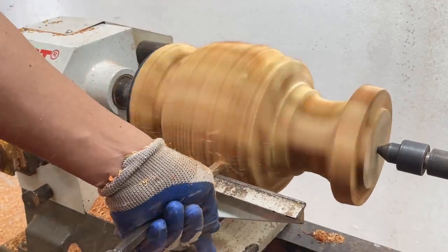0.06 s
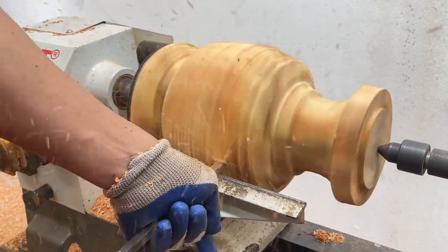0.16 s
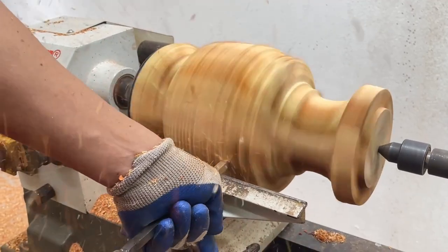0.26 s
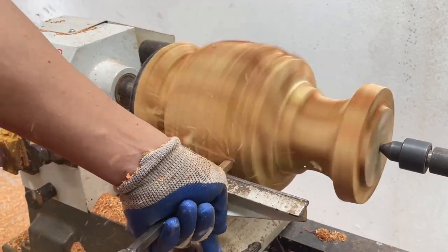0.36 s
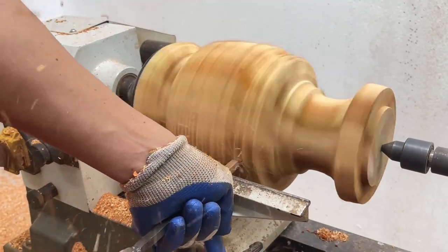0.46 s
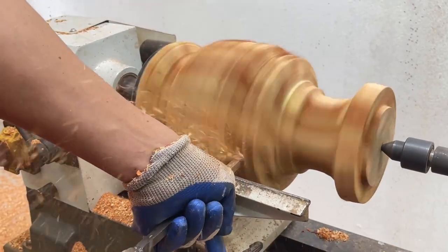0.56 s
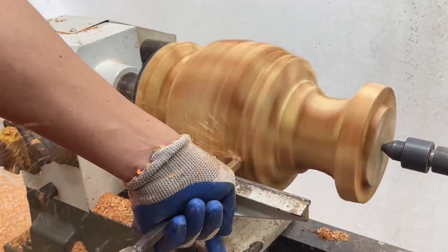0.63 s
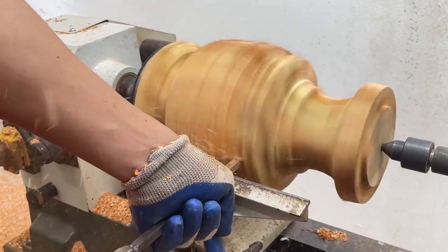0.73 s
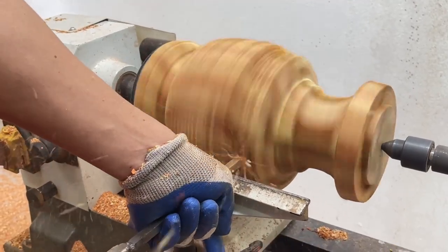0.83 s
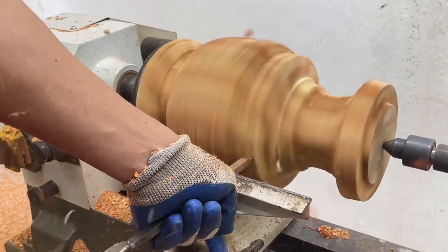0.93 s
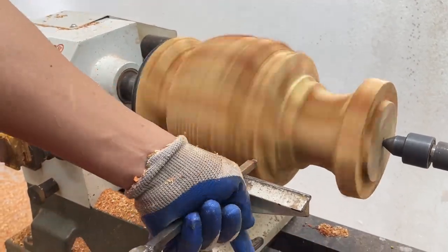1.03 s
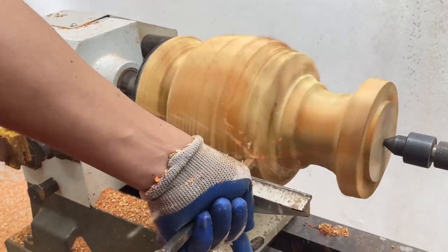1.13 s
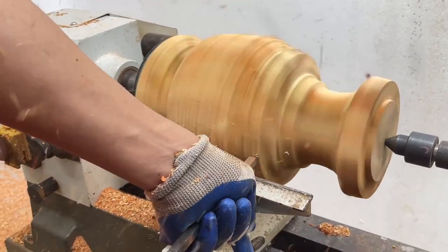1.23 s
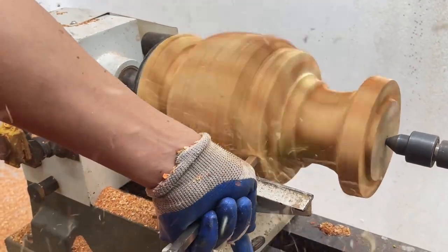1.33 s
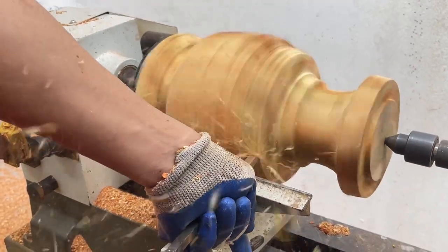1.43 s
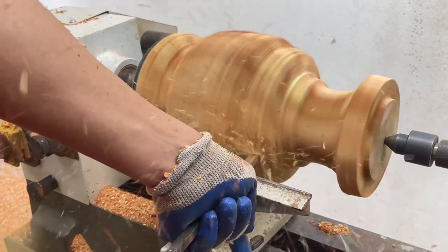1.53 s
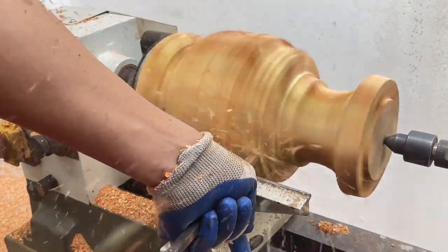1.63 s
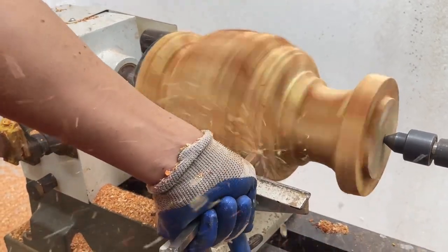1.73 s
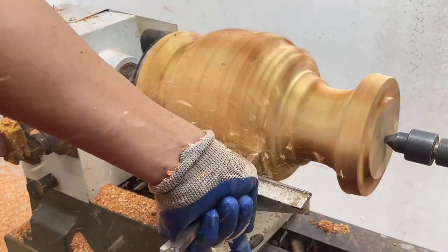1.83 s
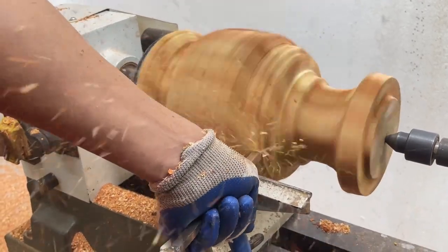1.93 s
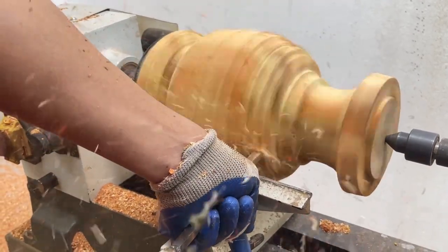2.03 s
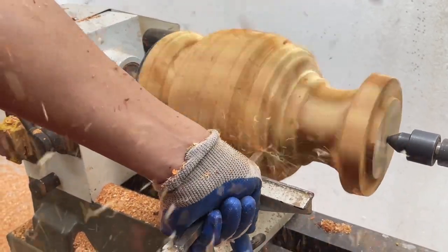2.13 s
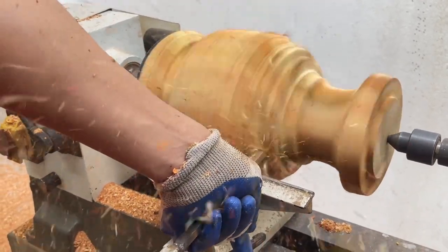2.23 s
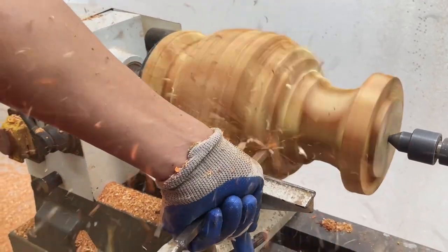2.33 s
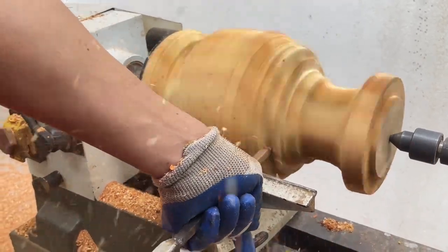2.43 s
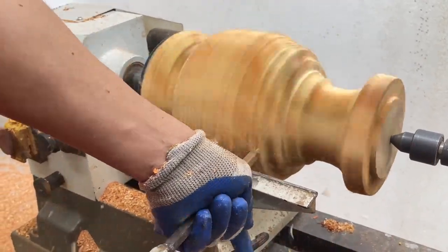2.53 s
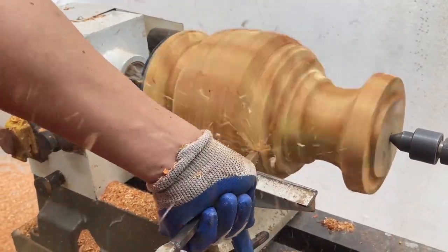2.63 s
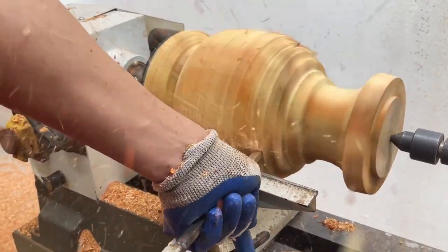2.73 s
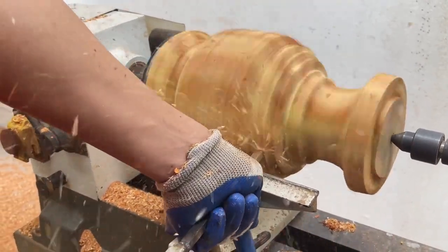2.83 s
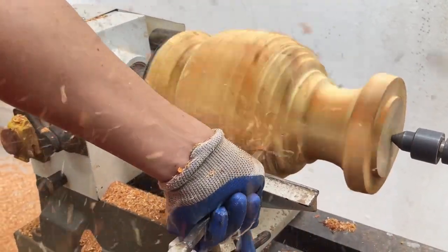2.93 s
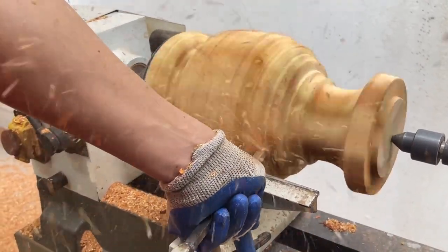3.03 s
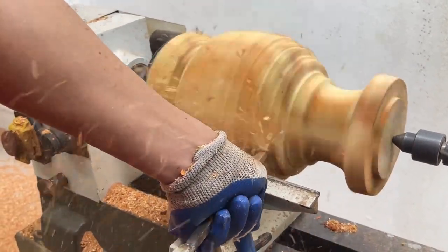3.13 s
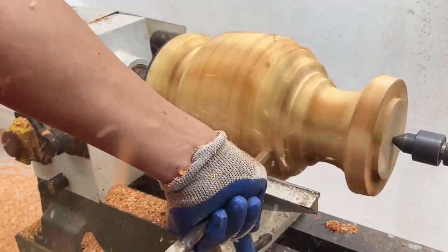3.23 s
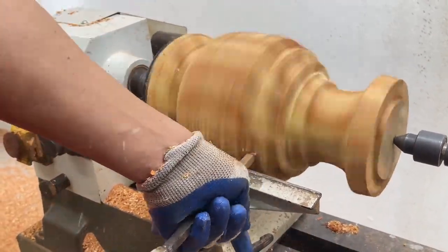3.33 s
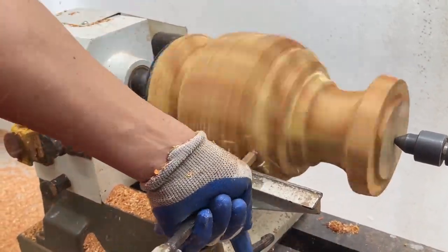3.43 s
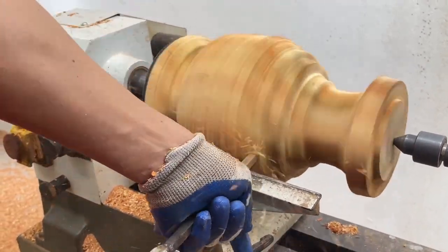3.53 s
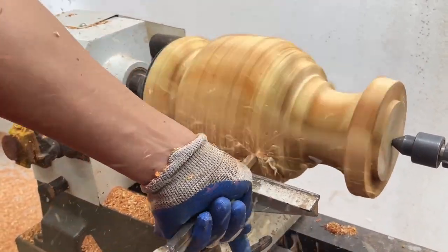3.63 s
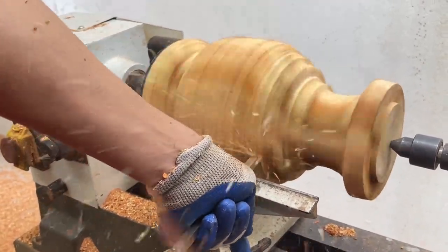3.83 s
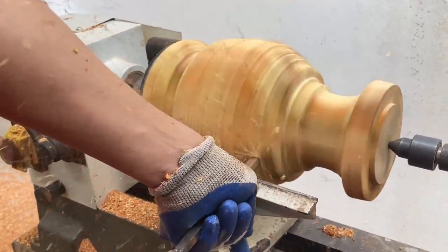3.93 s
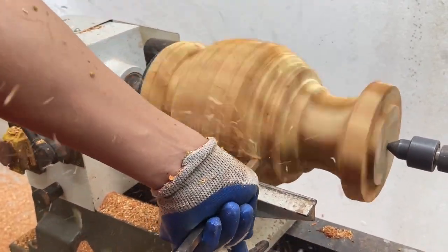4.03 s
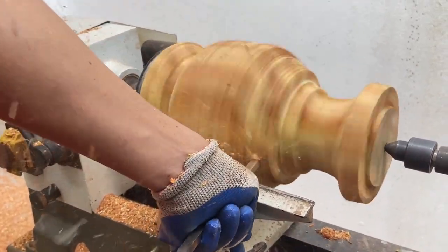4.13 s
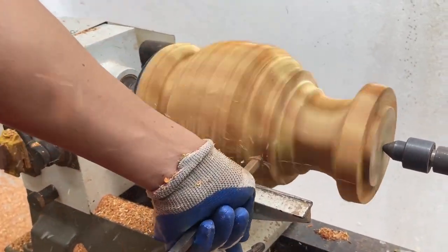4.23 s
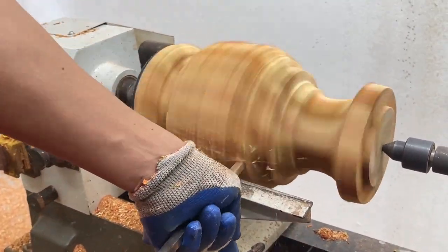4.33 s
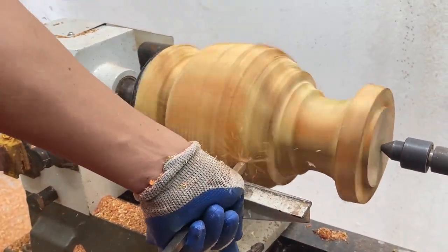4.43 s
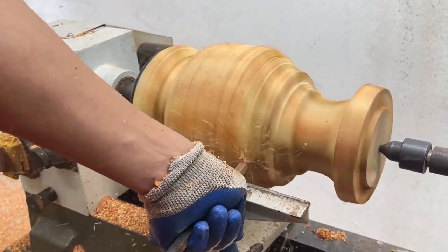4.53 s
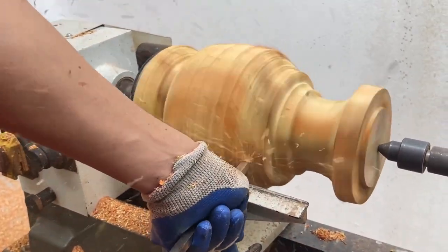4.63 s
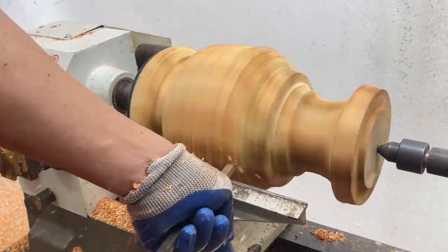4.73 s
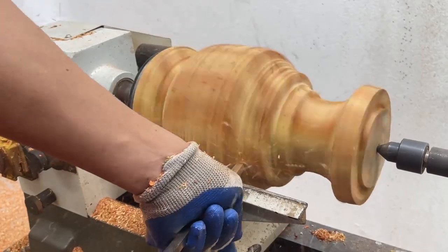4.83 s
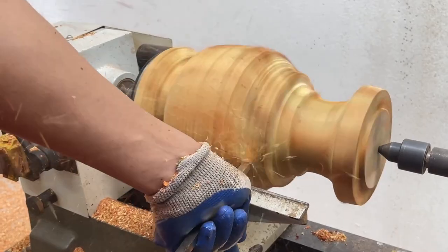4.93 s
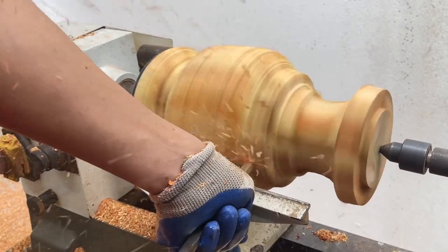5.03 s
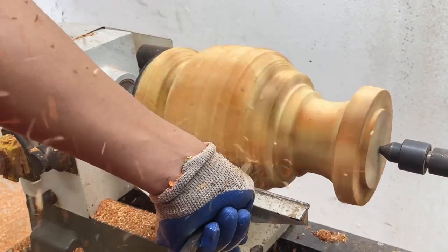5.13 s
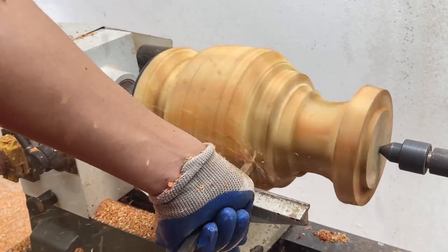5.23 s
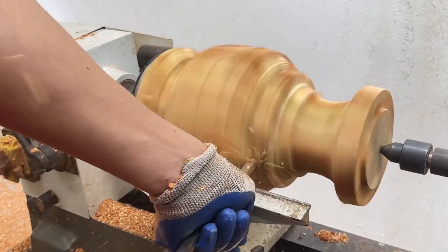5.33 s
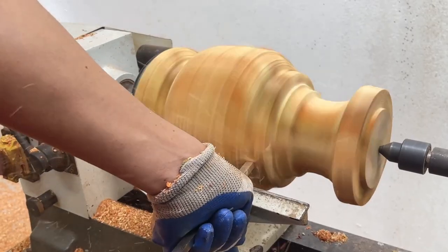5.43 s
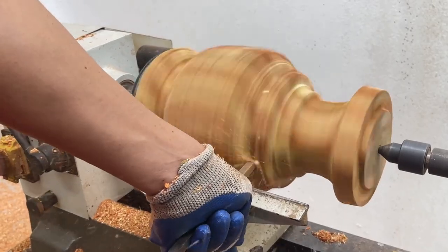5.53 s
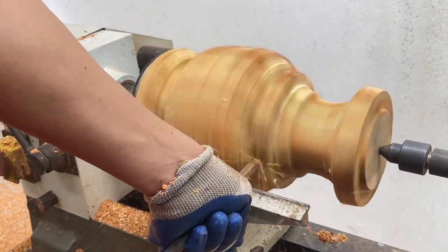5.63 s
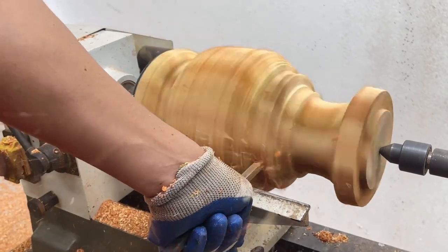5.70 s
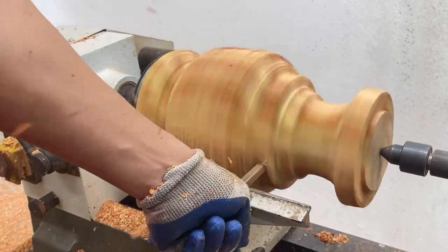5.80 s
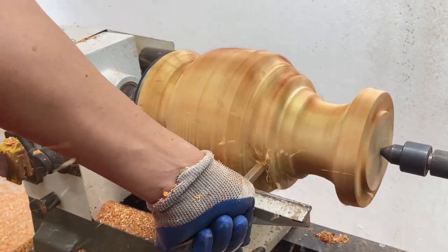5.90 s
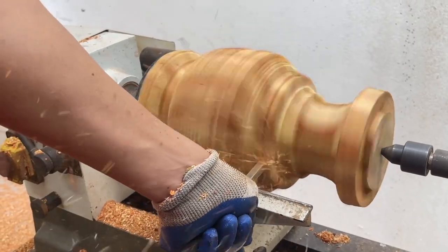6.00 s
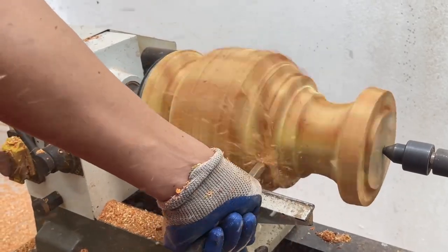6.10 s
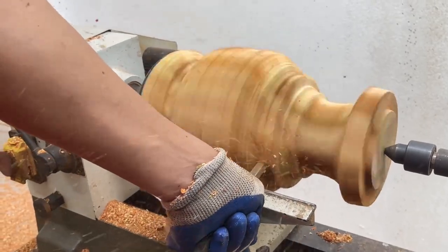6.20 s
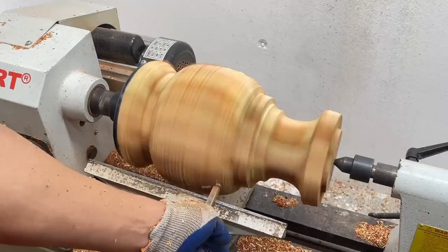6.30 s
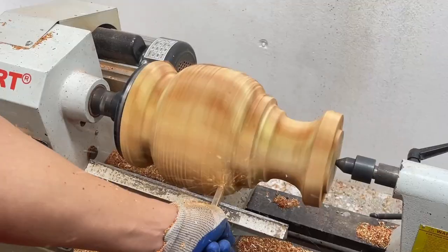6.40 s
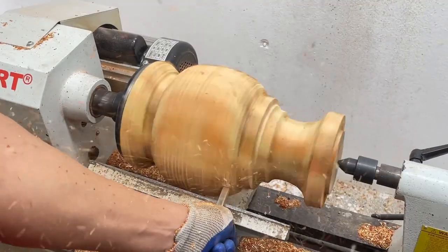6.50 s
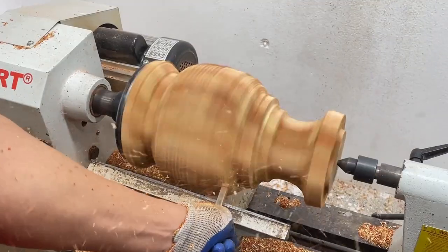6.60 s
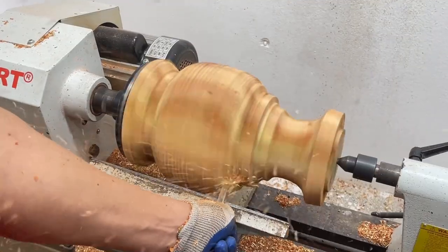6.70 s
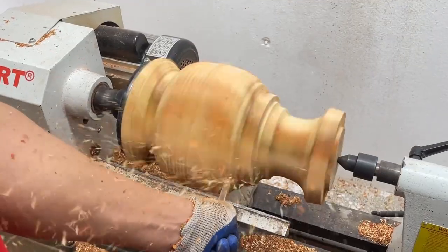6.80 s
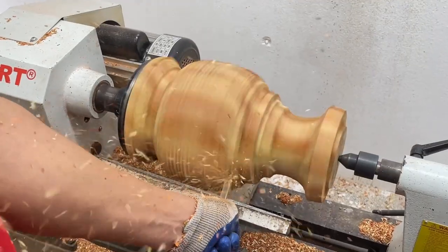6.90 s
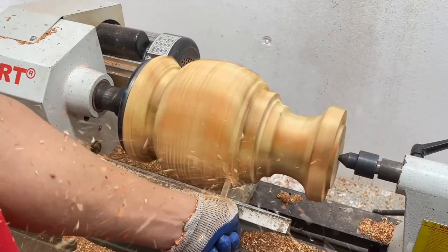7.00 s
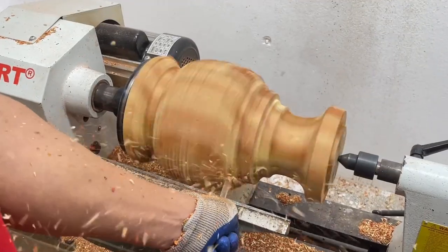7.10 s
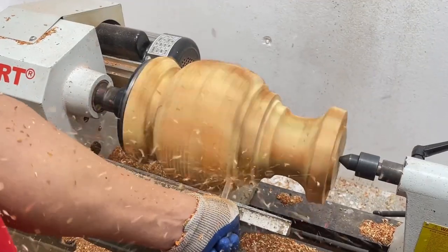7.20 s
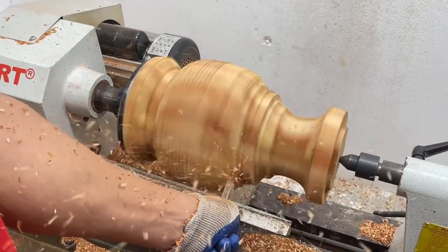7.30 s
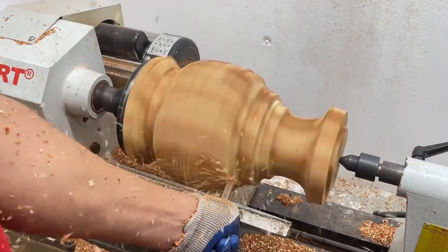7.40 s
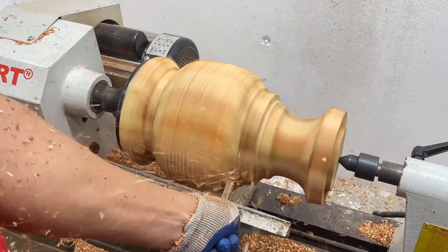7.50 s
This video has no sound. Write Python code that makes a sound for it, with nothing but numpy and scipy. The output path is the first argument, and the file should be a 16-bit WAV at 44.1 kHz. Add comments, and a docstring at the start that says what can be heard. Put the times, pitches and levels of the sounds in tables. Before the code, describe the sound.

Close, dry, gritty hiss of a hand tool cutting spinning wood, stroke after stroke, with motor hum surfacing in the pauses between cuts.

```python
"""Gouge on a wood lathe

A hand-held gouge cuts a vase blank spinning on a wood lathe, close by in a small workshop.
Fibres snap at the edge as random clicks over noise, throbbing with each turn.
Resonant filters for the blank, the tool rest and the steel colour the hiss.
Between strokes the hum of the drive, a wandering sine, comes through.
At times the blank chatters against the edge: a noisy resonance that locks into a tone."""
import sys
import numpy as np
from scipy import signal
from scipy.fft import rfft, irfft
from scipy.io import wavfile
from scipy.ndimage import uniform_filter1d

SR = 44100
rng = np.random.default_rng(int(sys.argv[2]) if len(sys.argv) > 2 else 0)


def master_out(mix):
    """Clip the mix to full scale and print it as 16-bit PCM to the path in sys.argv[1]."""
    frames = np.transpose(np.atleast_2d(mix))
    ceiling = np.clip(frames, -1, 1)
    pcm = np.round(ceiling * 32767).astype(np.int16)
    wavfile.write(sys.argv[1], SR, pcm)


N = 332955
TIME = np.arange(N) / SR


def amp(db):
    """Decibels to gain."""
    return 10 ** (np.asarray(db) / 20)


def unit(x):
    """Scales to rms 1."""
    return x / np.sqrt(np.mean(abs(x) ** 2) + 1e-20)


def curves(rows):
    """The columns of a table at every sample, joined by straight lines."""
    s, *columns = np.transpose(rows)
    return [np.interp(TIME, s, column) for column in columns]


def wander(hz):
    """Slow random curve of rms 1, up to about the given rate."""
    f = np.fft.rfftfreq(N, 1 / SR)
    spectrum = rfft(rng.standard_normal(N)) / (1 + (f / hz) ** 4)
    return unit(irfft(spectrum, N))


def colour(x, spectrum, modes=(), size=8192):
    """A causal filter of unit power gain: a broad response with resonances standing on it."""
    f = abs(np.fft.fftfreq(size, 1 / SR))
    hz, db = np.transpose(spectrum)
    broad = amp(np.interp(np.log(f + 1), np.log(hz), db))
    peaks = 1 + sum(amp(d) ** 2 / (1 + (2 * (f - c) / w) ** 2) ** 2 for c, w, d in modes)
    log_gain = np.log(broad * np.sqrt(peaks))
    # minimum phase
    taps = np.fft.ifft(np.exp(np.conj(signal.hilbert(log_gain)))).real[:size // 2]
    return signal.oaconvolve(x, taps / np.linalg.norm(taps))[:N]


def resonate(x, hz, width_hz):
    """A steep resonance that follows the curve hz; complex, with a real part of about rms 1."""
    turn = np.exp(2j * np.pi * np.cumsum(hz * np.ones(N)) / SR)
    r = np.exp(-np.pi * width_hz / SR)
    return np.sqrt(2) * unit(turn * signal.lfilter([1], [1, -2 * r, r * r], x / turn))


def decaying(x, decay_s):
    """Each impulse jumps up and dies away exponentially."""
    return signal.lfilter([1], [1, -np.exp(-1 / (decay_s * SR))], x)


def blows(rows, decay_s):
    """An envelope that jumps at each event and dies away."""
    return sum(amp(db) * (TIME >= s) * np.exp(-abs(TIME - s) / decay_s) for s, db in rows)


def bump(centre_s, half_s):
    """A smooth swell of height 1."""
    return np.exp(-((TIME - centre_s) / half_s) ** 2)


# the gouge moves to a new place on the blank, then the sound changes again just after the brief dip: time_s
CHANGES = [1.12, 6.337]


def stretch_index():
    """Which of the three stretches of the sound each sample falls in."""
    return np.searchsorted(CHANGES, TIME)


# stretches of the sound: skimming_rasp_db, skimming_sizzle_hz, hum_db
STRETCHES = [(-26, 9100, -40), (-22.5, 9175, -42.5), (-27, 9230, -36.5)]


def here():
    """The columns of STRETCHES at every sample."""
    return np.array(STRETCHES)[stretch_index()].T


def ring(x, spectrum, modes):
    """In each stretch of the sound, each mode is driven with its own strength."""
    stretch = stretch_index()
    sound = 0
    for k in range(len(CHANGES) + 1):
        driven = [(hz, width_hz, dbs[k]) for hz, width_hz, *dbs in modes]
        sound = sound + colour(x * (stretch == k), spectrum, driven)
    return sound


# base level of the rumble: time_s, level_db
RUMBLE_LEVEL = [(0, -53), (.35, -63), (.7, -54), (1.2, -62), (2.15, -57.5), (2.45, -65), (2.8, -59),
                (3.35, -55.5), (4.1, -57.5), (4.35, -53.5), (5.3, -56), (5.75, -66), (6.1, -49.5),
                (6.65, -55), (7.15, -70), (7.55, -73)]
# gouge knocks on its rest: start_s, level_db
KNOCKS = [(1.618, -48), (2.107, -47), (2.3, -37), (3.26, -45), (5.189, -34), (6.086, -34)]
# rumble spectrum: freq_hz, relative_db
RUMBLE = [(25, 0), (60, -8), (95, -6.5), (150, 2.5), (230, 0), (320, -2.5), (600, -11), (2000, -89)]
GAP_RISE_DB = 7  # added between strokes


def rumble(cutting):
    """Low rumble of uneven level, with thuds at the knocks; a little different at each side."""
    uneven_db = 4.2 * wander(12)
    level_db = curves(RUMBLE_LEVEL)[0] + GAP_RISE_DB * (1 - cutting)
    level = amp(level_db + uneven_db) + blows(KNOCKS, decay_s=0.0056)
    mid, side = (colour(level * rng.standard_normal(N), RUMBLE) for _ in range(2))
    return mid + amp(-6) * np.array([side, -side])


# overtones of the hum: multiple_of_hum_hz, level_db
HUM = [(2, -58.5), (3, -55)]
# bearing whirr: freq_hz, relative_db
IDLE = [(90, -38), (250, -5), (340, 10), (480, -11), (700, -2), (880, 0.5), (1050, 1), (1300, -7.5),
        (1600, -6), (2400, -14), (2900, -15), (3700, -17.5), (5000, -9), (15500, -29)]
HUM_HZ, HUM_SINK_DB = 284.8, 16  # sink during full cutting


def lathe(cutting):
    """Drive hum near eight times the spindle rate, quieter while cutting, stronger in gaps; bearing whirr."""
    *_, hum_db = here()
    cycles = np.cumsum(HUM_HZ * (1 + 0.0135 * wander(9.4))) / SR
    flutter = amp(1.6 * wander(25))
    hum = amp(hum_db - HUM_SINK_DB * cutting) * unit(np.sin(2 * np.pi * cycles))
    overtones = sum(amp(db) * resonate(rng.standard_normal(N), k * HUM_HZ, 13.7).real for k, db in HUM)
    whirr = amp(-47.5) * colour(rng.standard_normal(N), IDLE)
    return flutter * hum + overtones + whirr


# faint noise band: centre_s, half_length_s, pitch_hz, level_db
FAINT_BAND = (0.5, 2.1, 4850, -60)


def faint_band():
    """A faint, narrow noise band near 4.9 kHz that slowly swells and fades over the first seconds."""
    centre_s, half_s, hz, db = FAINT_BAND
    return amp(db) * bump(centre_s, half_s) * resonate(rng.standard_normal(N), hz, 122).real


SLACKEN_DB_PER_S = 0.5


def contact(start_s, end_s, attack_db_per_s, release_db_per_s):
    """One stroke's envelope: the edge sinks in, holds while the hand slackens, and lifts off."""
    held_db = SLACKEN_DB_PER_S * ((start_s + end_s) / 2 - np.clip(TIME, start_s, end_s))
    rise_db = attack_db_per_s * np.maximum(start_s - TIME, 0)
    fall_db = release_db_per_s * np.maximum(TIME - end_s, 0)
    return amp(held_db - rise_db - fall_db)


# strokes of the gouge; bite about 0 (skimming) to 1 (thick shaving):
# start_s, end_s, attack_db_per_s, release_db_per_s, hiss_db, push_db,
# bite_at_start, bite_at_end, sizzle_db, whistle_at_start_hz
STROKES = [(0.343, 0.914, 54, 198, -29, -36, 0.1, 0.068, -7.5, 14500),
           (0.95, 0.988, 3000, 470, -22.5, -31.5, .25, 0.44, -31, 13300),
           (1.218, 1.263, 1000, 282, -24, -36, 0.182, 0.28, -1, 13200),
           (1.345, 2.487, 1400, 336, -26.5, -36.5, 0.15, 0.94, 0, 12500),
           (2.648, 3.334, 620, 400, -27.5, -37.5, 0.098, 0.76, 0.5, 12500),
           (3.475, 3.512, 1700, 700, -33.5, -44, -0.073, 0, 4, 13000),
           (3.589, 4.301, 2400, 410, -27, -36.5, -0.062, 0.64, 0.5, 13300),
           (4.429, 4.759, 636, 490, -28, -37.5, 0.19, 0.47, -1, 12900),
           (4.848, 5.698, 900, 150, -28, -38, 0.42, 0.88, -1, 13000),
           (5.72, 5.843, 148, 420, -28.5, -39.5, 0.49, 1.02, -12, 12500),
           (5.928, 6.334, 1196, 2504, -28.5, -39, 0.9, 1.17, -4, 12500),
           (6.45, 6.642, 284, 218, -27.5, -34, -0.033, 0.19, -1, 13000),
           (6.702, 7.552, 188, 200, -27.5, -35.5, 0.014, 0.68, 4.5, 12900)]
# hand leans in or eases off: centre_s, half_length_s, change_db
LEANS = [(0.127, 0.013, 0), (0.376, 0.016, 1), (0.62, 0.03, -3.5), (0.8, 0.025, -0.5), (2.14, .06, 2),
         (2.44, .06, 2), (3.775, 0.039, 3.5), (3.874, 0.03, -0.5), (4.442, 0.033, -5), (4.86, .03, -7.5),
         (5.16, 0.075, 3), (5.5, 0.032, -2), (5.775, 0.026, 3), (6.013, 0.024, 1.5), (6.584, 0.034, 4.5),
         (6.747, 0.044, 1.5), (7.442, 0.19, -2)]
PUSH_LAG_S, PUSH_LIMIT_DB_PER_S = 0.014, 608  # the wood takes up the push later and slower


def hand():
    """The strength of the hiss at the edge and of the push on the wood, over all strokes."""
    hiss = push = 0
    for start_s, end_s, attack, release, hiss_db, push_db, *_ in STROKES:
        slower = [1 / (1 / rate + 1 / PUSH_LIMIT_DB_PER_S) for rate in (attack, release)]
        hiss = np.maximum(hiss, amp(hiss_db) * contact(start_s, end_s, attack, release))
        push = np.maximum(push, amp(push_db) * contact(start_s + PUSH_LAG_S, end_s, *slower))
    lean = amp(sum(db * bump(s, half_s) for s, half_s, db in LEANS))
    return hiss * lean, push * lean


SETTLED_HZ, SETTLE_S = 12500, 0.39  # whistle


def shaving():
    """Within a stroke the bite changes steadily and the whistle settles: bite, sizzle_db, whistle_hz."""
    rows = np.array(STROKES)
    changes_s = (rows[:-1, 1] + rows[1:, 0]) / 2
    start_s, end_s, *_, first, last, sizzle_db, whistle_hz = rows[np.searchsorted(changes_s, TIME)].T
    age_s = np.clip(TIME, start_s, end_s) - start_s
    bite = first + (last - first) * age_s / (end_s - start_s)
    return bite, sizzle_db, SETTLED_HZ + (whistle_hz - SETTLED_HZ) * np.exp(-age_s / SETTLE_S)


TURN_HZ = 35.5


def grain_throb():
    """The grain passes the edge in an uneven pattern each turn, changing as wood comes off; rms 1."""
    turns = np.cumsum(TURN_HZ * (1 + .004 * wander(2))) / SR
    orders = [(1, .65), (2, .55), (3, .35), (4, 1), (5, .4), (7, .5)]  # multiple of turn rate, weight
    return unit(sum(a * np.cos(2 * np.pi * k * turns + 1.3 * wander(2.5)) for k, a in orders))


def tugs(per_s, decay_s):
    """The load jumps as the edge hooks a bundle of fibres, and eases as it tears free; rms 1."""
    hooks = rng.exponential(1, N) * (rng.random(N) < per_s / SR)
    load = decaying(hooks, decay_s)
    return unit(np.tanh((load - load.mean()) / (2 * load.std())))


def fractures(load, per_s, spread_db, rub):
    """Snapping fibres of unequal size over the smooth rub of the bevel."""
    size = amp(spread_db * np.minimum(rng.exponential(1, N), 4.5))
    snaps = size * rng.choice([-1., 1.], N) * (rng.random(N) < per_s / SR)
    return unit(load * (unit(snaps) + rub * rng.standard_normal(N)))


def splinters(per_s, max_db):
    """Now and then a larger chip breaks away with a tick."""
    breaks = amp(max_db + rng.uniform(-7, 0, N)) * (rng.random(N) < per_s / SR)
    return decaying(breaks, decay_s=.0005) * rng.standard_normal(N)


# sharp catches of the edge: start_s, level_db
CATCHES = [(.953, -44), (1.216, -20), (1.247, -26), (1.348, -25), (1.620, -45), (2.086, -36), (2.107, -30),
           (2.615, -36), (3.585, -38), (4.841, -42), (5.927, -52), (6.964, -32), (7.069, -35)]
# broad steel response: freq_hz, relative_db
HISS = [(1500, -52), (3900, -16.5), (4700, -7.5), (5300, -5), (6500, 3), (8000, -0.5), (10000, -0.5),
        (12000, 3), (14000, -7.5), (16000, -12)]
# rest and gouge modes: freq_hz, width_hz, then over_broad_db in the first, second, third stretch
STEEL_MODES = [(4385, 37, 16, 16.5, 15.5), (6100, 550, 1, -4, -13), (6560, 170, 1, -1, -15),
               (7320, 50, -4, 6.5, 0), (7299.8, 50, 13.5, 6.5, 11), (10780, 170, 9, 9.5, 10),
               (11380, 110, 9.5, 13, 11), (11260, 48, 0, -6, -6), (14400, 300, 7, -4, 0)]
RASP_HZ, RASP_WIDTH_HZ, RASP_GAIN_DB = 5197, 560, 15  # gains, losses and drop: at bite 1
FIZZ_HZ, FIZZ_WIDTH_HZ, FIZZ_DB, FIZZ_LOSS_DB = 14730, 990, -6, 4.5
WHISTLE_WIDTH_HZ, WHISTLE_DB, WHISTLE_LOSS_DB = 1330, 2, 20
SIZZLE_WIDTH_HZ, SIZZLE_DROP_HZ = 880, 350
SIZZLE_BEST_BITE, SIZZLE_LOSS_DB = 0.6, 13.5  # loss at 1 bite away from best


def edge(load, hiss):
    """The shaving tears off: wide hiss in the steel, and bands that follow the depth of the bite."""
    bite, sizzle_db, whistle_hz = shaving()
    rasp_db, sizzle_hz, _ = here()
    tear = fractures(load, per_s=6800, spread_db=3.5, rub=0.68) + splinters(per_s=6.2, max_db=10)
    sizzle_db = sizzle_db - SIZZLE_LOSS_DB * (bite - SIZZLE_BEST_BITE) ** 2
    bands = [(rasp_db + RASP_GAIN_DB * bite, RASP_HZ, RASP_WIDTH_HZ),
             (sizzle_db, sizzle_hz - SIZZLE_DROP_HZ * bite, SIZZLE_WIDTH_HZ),
             (WHISTLE_DB - WHISTLE_LOSS_DB * bite, whistle_hz, WHISTLE_WIDTH_HZ),
             (FIZZ_DB - FIZZ_LOSS_DB * bite, FIZZ_HZ, FIZZ_WIDTH_HZ)]
    sound = amp(-2.0) * ring(tear, HISS, STEEL_MODES)
    for db, hz, width_hz in bands:
        snaps = fractures(load, per_s=3500, spread_db=3.5, rub=0.84)
        sound = sound + amp(db) * resonate(snaps, hz, width_hz).real
    return sound * (hiss + blows(CATCHES, decay_s=.005))


def sway(x, patchy_db):
    """As the edge travels over the grain, patches of the spectrum swell and fade independently."""
    z = signal.stft(x, nperseg=1024, noverlap=768)[2]
    patches = uniform_filter1d(rng.standard_normal(z.shape), size=5, axis=0)
    patches = unit(uniform_filter1d(patches, size=22, axis=1))
    return signal.istft(z * amp(patchy_db * patches), nperseg=1024, noverlap=768)[1][:N]


# broad wood response: freq_hz, relative_db
WOOD = [(70, -63), (170, -18), (280, -7), (480, -8), (700, -7.5), (850, 2.5), (1150, -1), (1500, -3),
        (1900, 1.5), (2220, -3.5), (2450, -9.5), (2750, -1), (3150, -2.5), (3500, -7), (6000, -17)]
# blank and rest modes: freq_hz, width_hz, then over_broad_db in the first, second, third stretch
WOOD_MODES = [(314, 31, 18, 12.5, 19.5), (786, 24, 1, 3.4, 4.4), (924, 87, 2, 4.8, 5.5),
              (1070, 8.4, 1, 10, 3.5), (1231.5, 24, 12, 14.8, 13.7), (1379.7, 56, 10.5, 11.3, 13.6),
              (1650, 93, -8, 1, 1), (2028, 53, -3, 9.8, 11), (2230, 29, -8, 9.5, 7.3),
              (2694, 107, 10.5, 5.7, 2), (2894, 76, 7, 2.6, 11.3), (3153, 96, 8.5, 10.9, 5.9)]


def blank(load, push):
    """The jolts of the cut ring the blank and the tool rest."""
    jolts = unit(sway(fractures(load, per_s=2500, spread_db=2.0, rub=0.83), patchy_db=1.3))
    return ring(jolts * push, WOOD, WOOD_MODES)


# bursts of chatter: centre_s, half_length_s, level_db
CHATTERS = [(0.701, 0.05, -31), (0.759, 0.013, -22.5), (0.828, 0.051, -26.5), (5.204, 0.039, -36),
            (5.312, 0.076, -40), (5.44, 0.07, -31), (5.541, 0.052, -37), (5.638, 0.07, -32.5),
            (6.077, 0.084, -42.5), (6.208, 0.082, -35), (7.219, 0.12, -38.5)]
CHATTER_HZ, BEND_DB, LOCK_DB = 414.2, -7.5, -36  # BEND_DB is relative to the push


def chatter(load, push):
    """The blank's bending mode feeds on the cut; when strong it locks into a tone with a faint octave."""
    bursts = sum(amp(db) * bump(s, half_s) for s, half_s, db in CHATTERS)
    level = np.sqrt((amp(BEND_DB) * push) ** 2 + bursts ** 2)
    loose = resonate(fractures(load, per_s=1500, spread_db=1.5, rub=0.99), CHATTER_HZ, 34.8)
    flutter = amp(1.5 * wander(22))
    cycles = np.cumsum(CHATTER_HZ + 5 * wander(12)) / SR
    locked = np.sqrt(2) * flutter * np.exp(2j * np.pi * cycles)
    share = level ** 2 / (level ** 2 + amp(LOCK_DB) ** 2)
    swing = np.sqrt(share) * locked + np.sqrt(1 - share) * loose
    octave = amp(1) * level ** 2 * (swing ** 2).real  # squaring doubles the pitch
    return level * swing.real + octave


def workshop(x, t60_s, wet_db):
    """Quick reflections off the lathe and the wall, different at each side."""
    t = np.arange(SR // 3) / SR
    sparse = rng.standard_normal((2, len(t))) * (rng.random((2, len(t))) < 4000 / SR)
    taps = sparse * (t > .001) * amp(-60 * t / t60_s)
    taps /= np.linalg.norm(taps, axis=1, keepdims=True)
    return x + amp(wet_db) * signal.oaconvolve(x[None], taps, axes=1)[:, :N]


CUTTING_DB, LEVEL_LAG_S = -42.5, 0.014  # push at the halfway point; lag of the hum and rumble levels


def scene():
    """Strokes and one uneven cutting load drive edge, blank and chatter; the hum is stronger in the gaps."""
    hiss, push = hand()
    lagged_push = decaying(push, LEVEL_LAG_S) / (LEVEL_LAG_S * SR)
    cutting = lagged_push ** 2 / (lagged_push ** 2 + amp(CUTTING_DB) ** 2)  # 0 to 1
    # shared load swing in dB, scaled below for blank and chatter
    swing = 1.0 * grain_throb() + 0.47 * tugs(per_s=260, decay_s=0.0043) + 0.74 * wander(23)
    steel = amp(-1.89) * workshop(edge(amp(swing), hiss) + faint_band(), t60_s=0.1, wet_db=-5.5)
    wood = workshop(blank(amp(1.12 * swing), push), t60_s=0.066, wet_db=-3.5)
    machine = workshop(chatter(amp(.5 * swing), push) + lathe(cutting), t60_s=0.1, wet_db=-11)
    balance = amp([[-.15], [.15]])  # left, right
    return (steel + wood + machine + rumble(cutting)) * balance


# brief dip in level: start_s, end_s
DIP = (6.329, 6.345)
LOW_CUT_HZ, TOP_HZ = 174, 16000


def record(dry):
    """The microphone sheds the deep bass; the level dips briefly once; then the band limit."""
    high_pass = signal.butter(2, LOW_CUT_HZ, "highpass", fs=SR, output="sos")
    thin = signal.sosfilt(high_pass, dry)
    dip = uniform_filter1d(1. * ((TIME > DIP[0]) & (TIME < DIP[1])), 60)
    low_pass = signal.firwin(511, TOP_HZ, window=("kaiser", 9), fs=SR)
    return signal.oaconvolve(thin * amp(-22 * dip), low_pass[None], "same", axes=1)


dry = scene()
out = record(dry)
master_out(out)
```